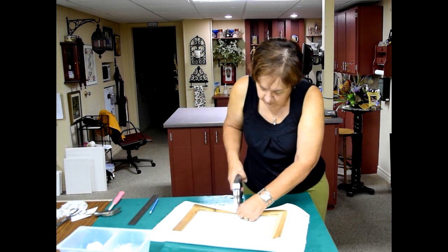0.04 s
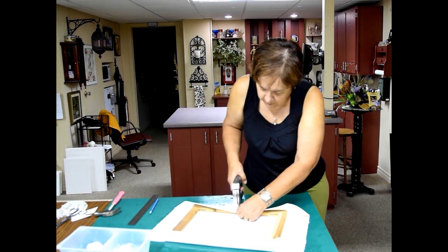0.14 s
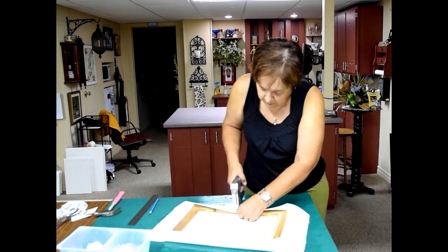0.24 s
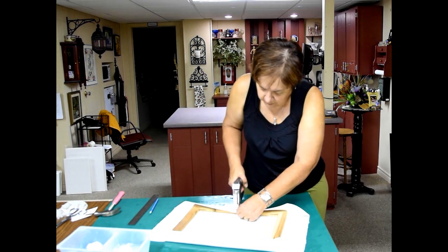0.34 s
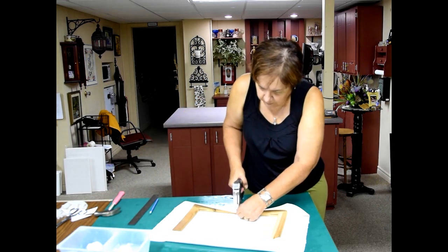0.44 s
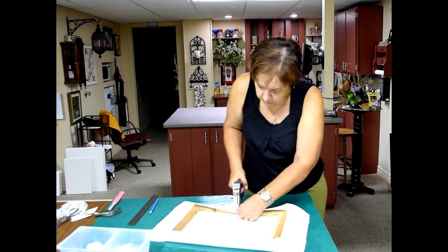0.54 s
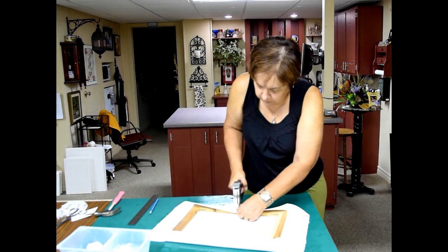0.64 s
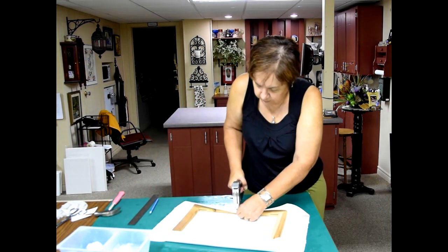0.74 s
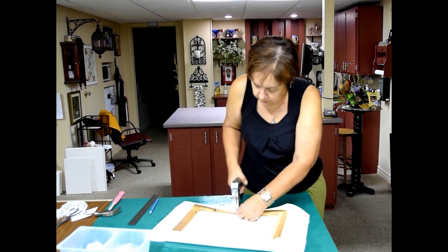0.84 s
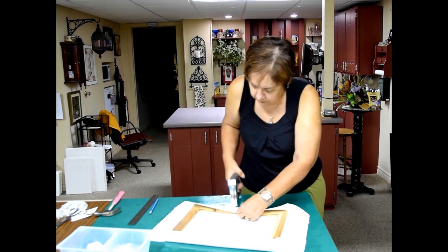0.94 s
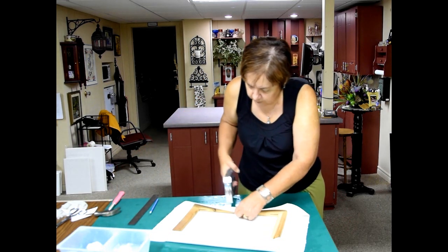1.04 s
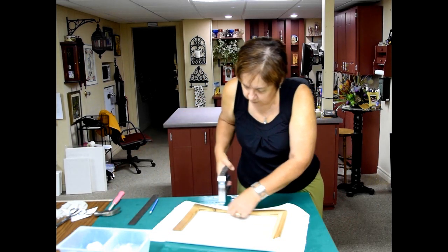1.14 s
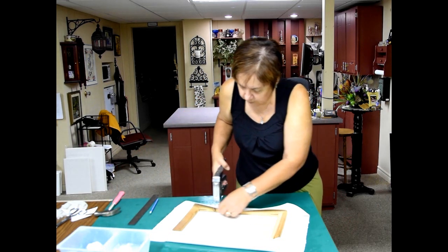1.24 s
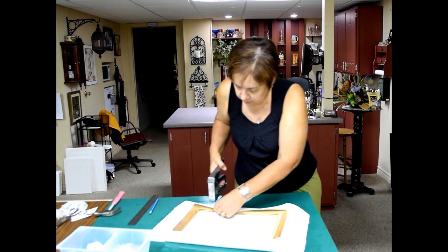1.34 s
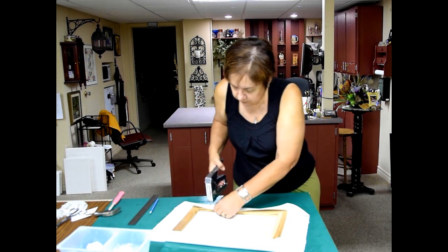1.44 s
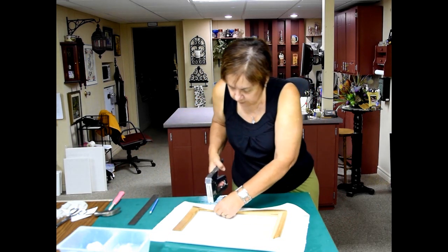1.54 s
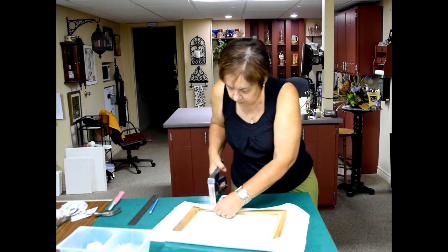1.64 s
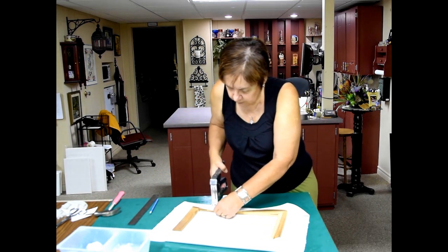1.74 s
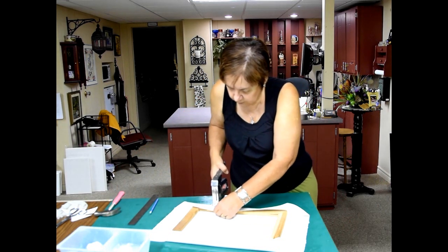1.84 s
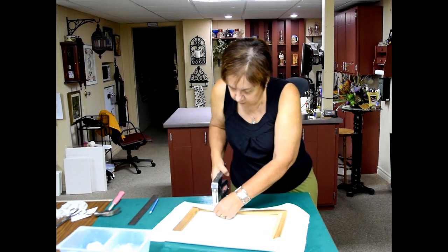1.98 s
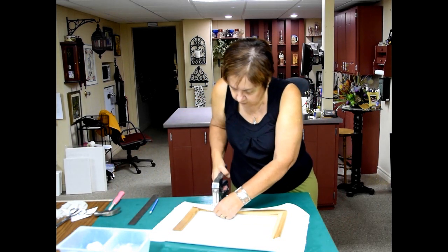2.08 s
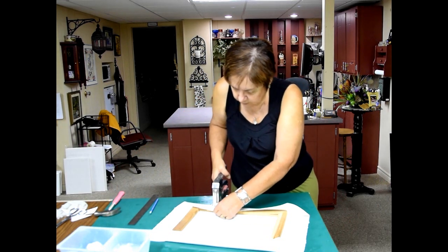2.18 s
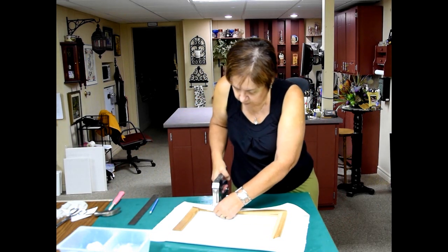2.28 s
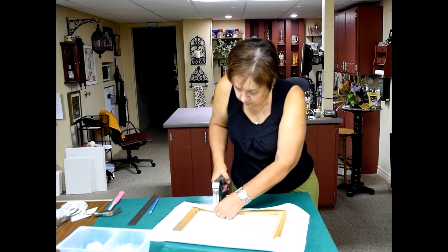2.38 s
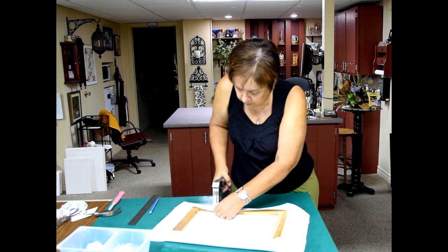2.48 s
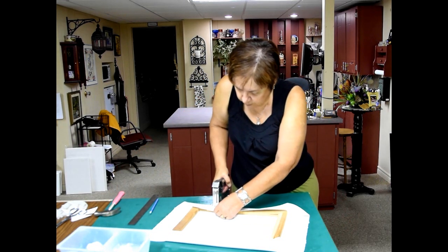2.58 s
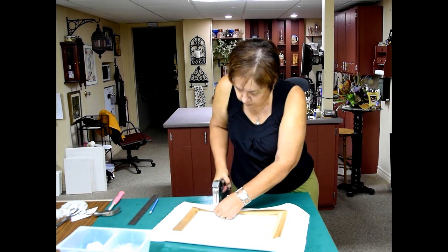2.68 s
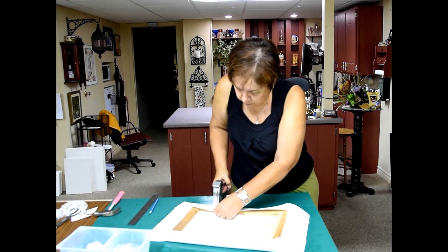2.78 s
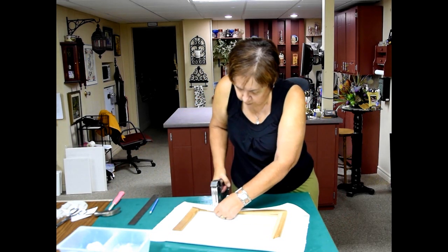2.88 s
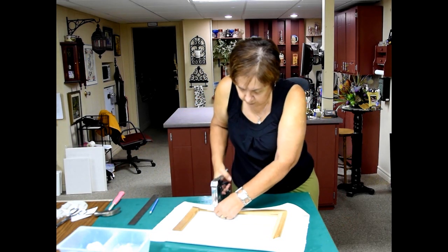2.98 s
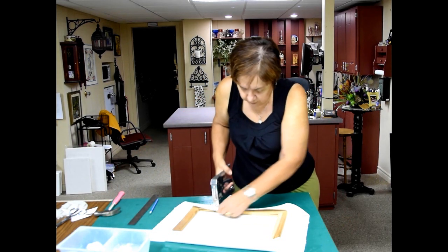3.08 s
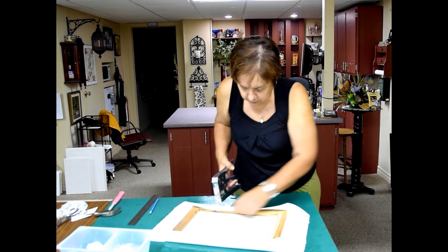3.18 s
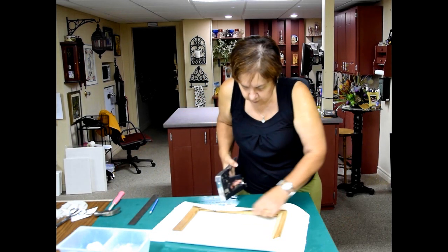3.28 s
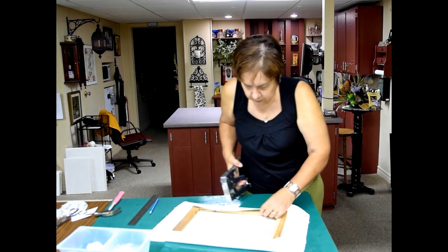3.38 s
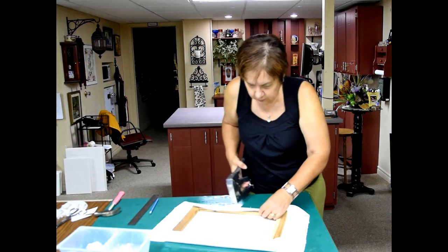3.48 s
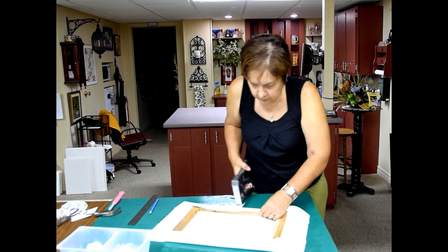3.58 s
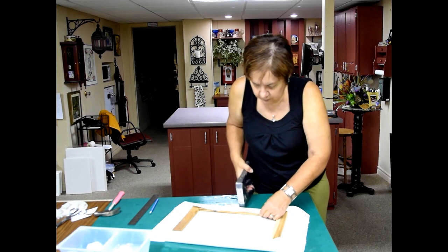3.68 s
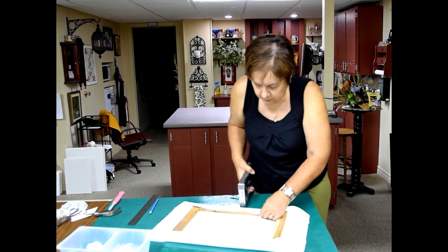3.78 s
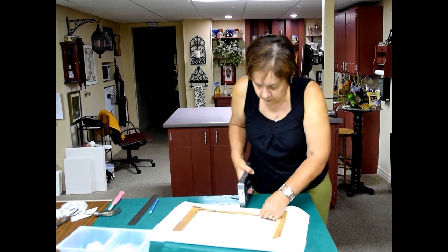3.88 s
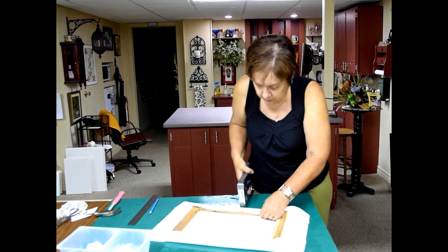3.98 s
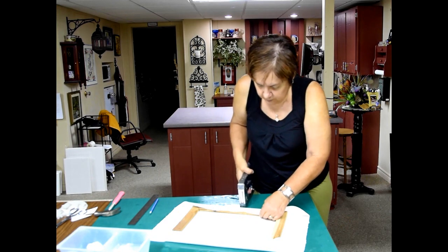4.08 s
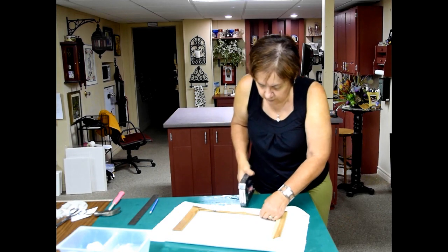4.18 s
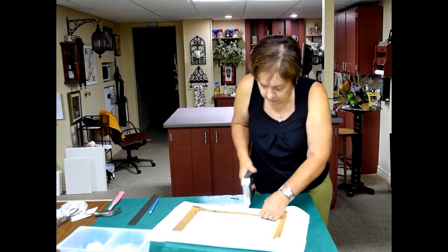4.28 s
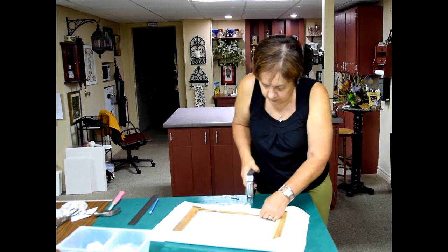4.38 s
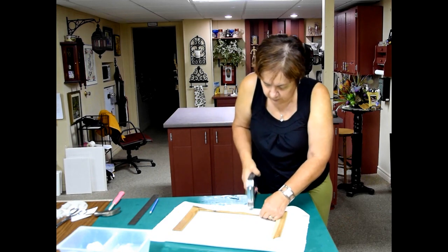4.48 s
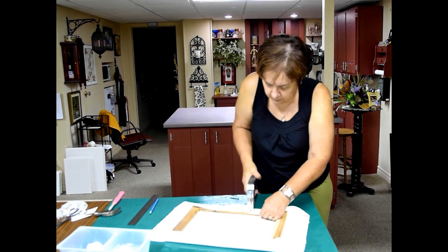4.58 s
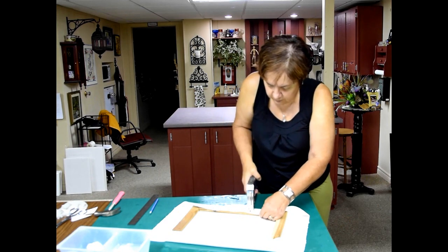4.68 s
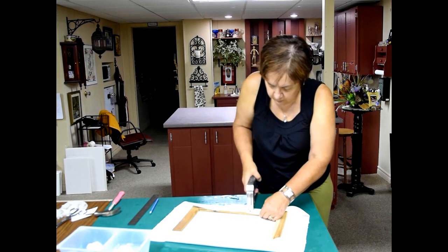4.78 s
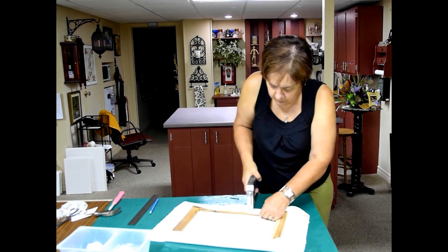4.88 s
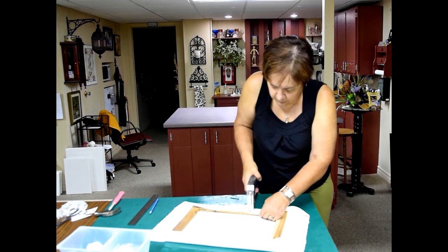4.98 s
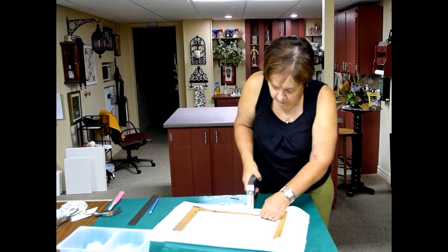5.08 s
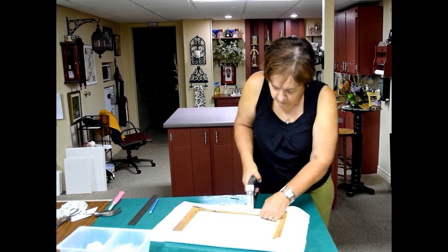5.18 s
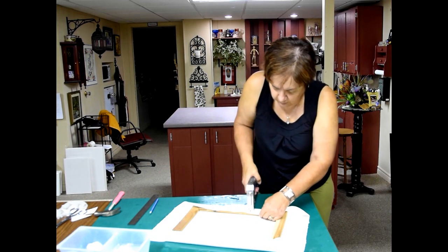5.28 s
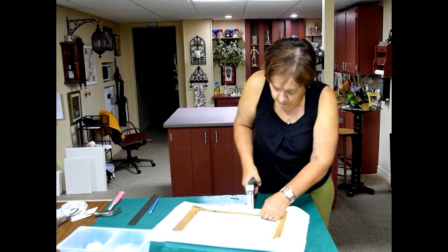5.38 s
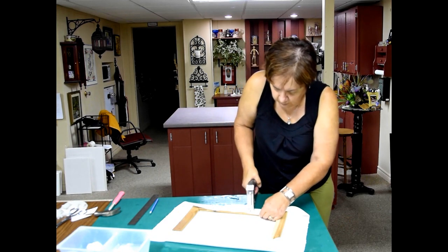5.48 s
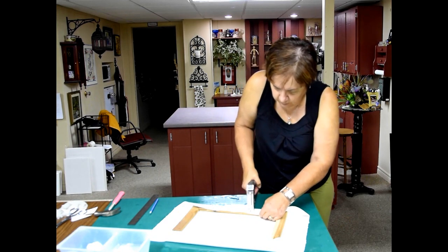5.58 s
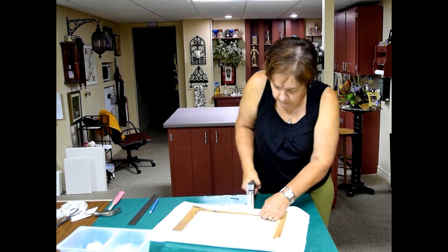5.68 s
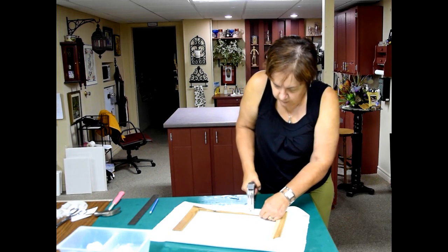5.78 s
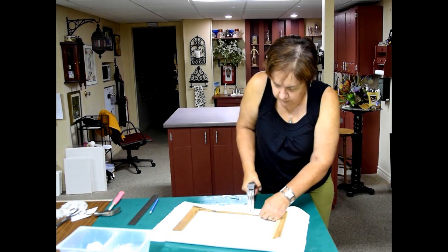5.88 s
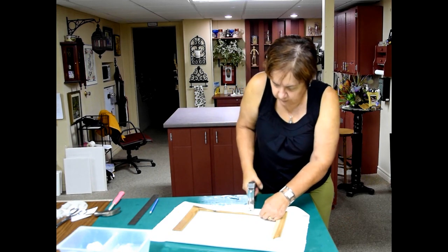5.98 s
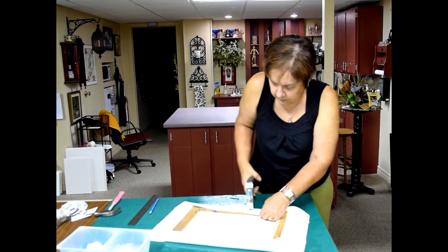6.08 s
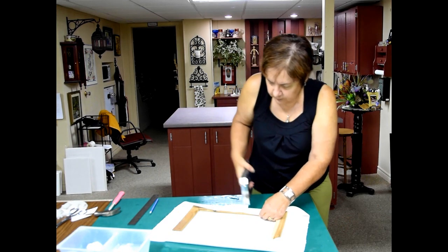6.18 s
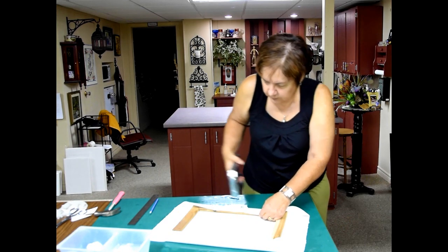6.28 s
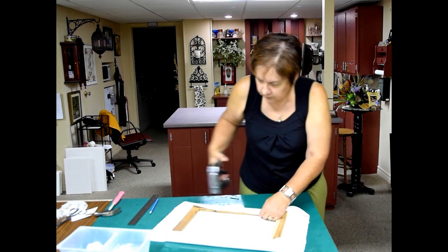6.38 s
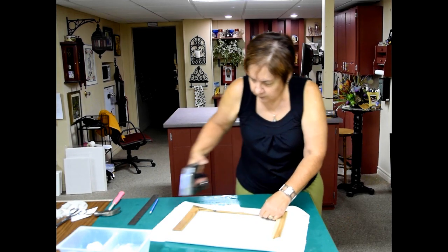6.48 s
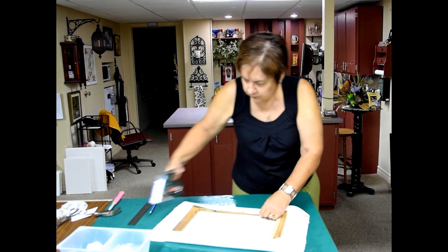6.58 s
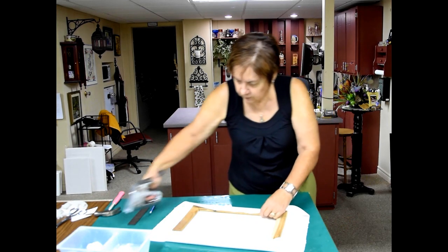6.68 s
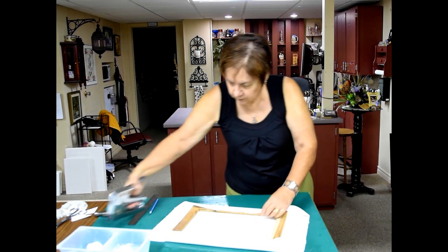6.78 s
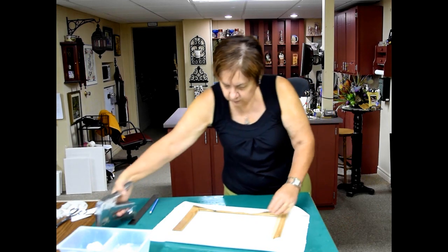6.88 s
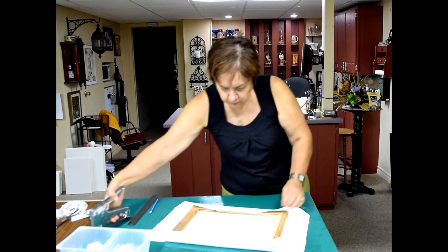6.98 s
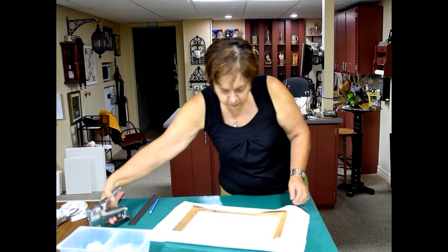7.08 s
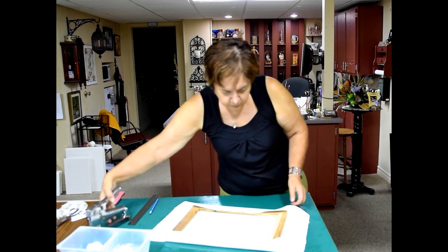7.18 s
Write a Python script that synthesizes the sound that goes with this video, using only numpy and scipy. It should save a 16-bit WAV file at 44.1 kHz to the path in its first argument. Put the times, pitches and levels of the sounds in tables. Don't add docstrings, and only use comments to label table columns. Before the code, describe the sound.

Quiet ventilation hush with a barely audible ticking clock. A lever is squeezed with light clicks, then a harsh, broad snap drives a staple; the lever rattles back. Two more shots follow, with hollow bumps on frame and table between. The hush surges at each shot, then sinks and slowly returns. Short indoor reverberation; the tool clatters down at the end.

```python
import sys
import numpy as np
from scipy import signal
from scipy.fft import rfft, irfft
from scipy.io import wavfile
from scipy.ndimage import uniform_filter1d

SR = 44100
rng = np.random.default_rng(int(sys.argv[2]) if len(sys.argv) > 2 else 0)


def file_out(sig):
    cols = np.atleast_2d(sig).T
    lim = np.clip(cols, -1, 1)
    pcm = np.round(lim * 32767).astype(np.int16)
    wavfile.write(sys.argv[1], SR, pcm)


def level_to_linear(level):
    exponent = np.asarray(level, float) / 20
    return 10 ** exponent


N = 319416

# [f/Hz, density/dB per Hz]
AIR_COLOUR = [(35, -60), (100, -36.5), (200, -19.5), (300, -10), (560, -5), (1010, 0), (2490, -10),
              (3400, -17.5), (4700, -27), (5600, -45.5), (9000, -59.5), (17600, -110)]
# [t/s, half length/s, level/dB]
PAPER_RUSTLES = [
    (2.45, 0.33, 2),
    (6.85, .06, 2.5),
    (5.6, .2, 2.5),
]
# [held open/s, sinks by/dB, still short when mostly back/dB, fully back/s]
HUSH_DUCKING = [
    (.1, 8.5, 2.5, 2.1),
    (.2, 12, 4.5, 0.98),
    (.36, 20.5, 0.5, .98),
]
# [f/Hz, T60/s]
ROOM_DECAY = [(45, 0.19), (110, 0.19), (280, 0.38), (700, 0.3), (1800, 0.29), (5000, 0.32), (13000, .3)]
# [t/s, peak level/dB, treble level/dB, strongest ring f/Hz]
TABLE_KNOCKS = [
    (2.107, -42.5, -31, 279.3),
    (3.026, -13.5, -31.5, 636),
    (3.849, -9, -31, 277),
    (4.662, -28, -36, 645),
    (4.673, -20, -26, 255.4),
    (6.088, -11.5, -11.5, 300),
]
# [t/s, peak level/dB, treble level/dB, strongest ring f/Hz]
GUN_ROCKING = [
    (7.088, -14, -26.5, 311),
    (7.099, -15, -41, 596),
    (7.112, -12.5, -28, 600),
    (7.122, -12, -29.5, 626),
    (7.135, -21.5, -28.5, 620),
    (7.155, -49, -31, 602),
    (7.208, -51, -37, 290),
]
# [t/s, peak level/dB, treble level/dB, strongest ring f/Hz, rattle/ms]
LEVER_RELEASES = [(1.191, -47, -35, 1120, 9), (1.238, -6.5, -15, 1285, 25), (1.248, -26, -32, 1427, 12),
                  (1.269, -19, -7, 1480, 8.4), (3.031, -10.5, -18, 2460, 5), (3.119, -27, -25.5, 2030, 9.6),
                  (3.296, -2, -22.5, 2060, 14), (3.323, -18.5, -6, 1640, 21), (3.365, -39, -24, 1650, 10),
                  (3.4, -24, -5.5, 1480, 3.9), (3.468, -34, -42, 1350, 21), (6.197, -31.5, -47, 1790, 11),
                  (6.294, -4.5, -22.5, 1960, 18), (6.322, -21.5, -15, 1910, 46)]
# [t/s, peak level/dB, treble level/dB, strongest ring f/Hz]
COCKING_CLICKS = [(0.154, -42, -26, 2030), (0.186, -37, -40.5, 1680), (0.463, -45, -44, 1540),
                  (0.509, -25.5, -33, 2100), (0.571, -18.5, -21.5, 2255), (0.584, -22, -20, 2240),
                  (0.606, -30, -15, 2340), (2.152, -37, -17, 2130), (2.191, -44.5, -27, 1230),
                  (2.341, -38, -34, 2240), (2.4, -36, -39.5, 1040), (2.552, -39.5, -34, 4060),
                  (2.605, -43, -29, 2240), (2.686, -9, -9, 3110), (2.708, -10, -15, 1260),
                  (4.266, -27, -17, 3320), (5.324, -27, -31.5, 2240), (5.349, -40.5, -31.5, 2270),
                  (5.568, -35.5, -42, 2340), (5.712, -4.5, -8, 3140), (5.734, -10, -16, 1270),
                  (6.182, -28, -24.5, 2140)]
# [t/s, peak level/dB, treble level/dB, strongest ring f/Hz,
# rattle/ms]
FURTHER_CATCHES = [
    (0.537, -38, -31.5, 1970, 5.6),
    (0.551, -33, -29.5, 2300, 13),
    (0.567, -13, -5, 2205, 4.3),
    (1.057, -34.5, -31.5, 3430, 16),
    (1.08, -40, -31.5, 2600, 26),
    (2.647, -28.5, -42, 1833, 51),
    (5.675, -19.5, -30, 1816, 18.4),
    (6.066, -28, -47.5, 1150, 6),
]
# [t/s, peak level/dB, treble level/dB, strongest ring f/Hz]
STRIKER_BLOWS = [
    (0.723, 4, -12, 2397),
    (2.806, 3.5, -13, 1760),
    (5.864, 1, -10.5, 2392),
]
# [t/s, f/Hz, level/dB, T60/s]
RINGING_PARTS = [(0.569, 2267, -26, 0.11), (0.606, 2300, -44.5, 0.4), (1.240, 4990, -41, 0.15),
                 (1.246, 1374, -36.5, 0.22), (1.240, 2860, -24.5, 0.056), (3.034, 2220, -34, 0.22),
                 (3.299, 1948, -26.5, 0.21), (3.324, 1658, -34.5, 0.32), (5.325, 2230, -38.5, 0.1),
                 (5.735, 1253, -38, 0.1), (6.184, 2050, -41.5, 0.18), (6.086, 449.5, -29, 0.17),
                 (6.295, 1930, -22, 0.09), (6.311, 1480, -35, 0.25)]

# [f/Hz, density/dB per Hz]
KNOCK_COLOUR = [(18, -57.5), (30, -27.5), (170, -20.5), (230, -5.5), (328, -7), (426, -9.5), (702, -9.5),
                (780, -14.5), (844, -16), (2230, -15), (16000, -65)]
ROCKING_COLOUR = [(18, -69), (30, -31.5), (161, -19.5), (303, -5), (461, -13), (600, -6), (1010, -14),
                  (1160, -11.5), (9710, -44.5), (13700, -59.5), (16000, -111)]
RELEASE_COLOUR = [(120, -99), (200, -65), (601, -25.5), (836, -23.5), (1400, -2), (1910, -1.5),
                  (3130, -8.5), (9580, -24.5), (12400, -39), (16000, -64)]
COCKING_COLOUR = [(59, -66), (100, -32.5), (547, -14), (891, -19), (1280, -4.5), (1450, -8.5), (2270, -2),
                  (9020, -17.5), (12900, -26.5), (16000, -55.5)]
BLOW_COLOUR = [(18, -54), (30, -31.5), (157, -35.5), (273, -4.5), (384, -10.5), (512, -8), (780, -10),
               (2410, -2.5), (3140, -8), (3580, -7.5), (5740, -14), (9460, -12), (16000, -33.5)]

# [f/Hz, width/Hz, boost/dB]
TABLE_MODES = [(290, 72, -8.5), (608, 23, 2), (934, 100, 0), (1194, 40, 2.5), (2300, 170, 1)]
RELEASE_MODES = [(1480, 170, 0.64), (2860, 30, 0.67), (4990, 140, 4), (7050, 69, 0.75), (9300, 220, 1)]
COCKING_MODES = [(1230, 90, -5.5), (3100, 90, 1.2), (3720, 170, 2), (9390, 210, 1.8)]
BLOW_MODES = [(545, 110, 2), (1350, 500, 4.5), (4260, 570, 0), (7130, 230, 0.5), (9450, 290, -2.5)]

AIR_REST_DB, AIR_WIDTH_DB, AIR_TOP_DB = -60, 1.1, -55
OPEN_DB, OPENING_S, CLOSING_S = 18.5, 0.12, 0.04
DEEPEST_S, HALF_BACK_S = 0.64, 0.9
SHUT_SHARE = 0.34
TICK_FIRST_S, TICK_EVERY_S, TICK_HZ, TICK_DB = 0.053, 0.5004, 4120, 6.5
OVERLOAD, CUTOFF_HZ, GRAIN_DB = 0.8, 16500, -95.5


def at_hz(points, hz):
    f_hz, values = np.array(points)[:, :2].T
    return np.interp(np.log(hz), np.log(f_hz), values)


def drift(rate):
    knots = rng.standard_normal(400)
    return np.interp(np.arange(N) / SR * rate, np.arange(400), knots)


def bands(count=20):
    edges = 20 * 2 ** (np.arange(count + 1) / 2)
    for low, high in zip(edges, edges[1:]):
        yield np.sqrt(low * high), signal.butter(2, [low, high], "band", fs=SR, output="sos")


def background_db(s):
    level = AIR_REST_DB
    for at, half_s, db in PAPER_RUSTLES:
        level = level + db * np.exp(-((s - at) / half_s) ** 2)
    for (at, *_), (open_s, sink_db, short_db, back_s) in zip(STRIKER_BLOWS, HUSH_DUCKING):
        steps_s = [-OPENING_S, 0, open_s, open_s + CLOSING_S, DEEPEST_S, HALF_BACK_S, back_s]
        steps_db = [0, OPEN_DB, OPEN_DB, -SHUT_SHARE * sink_db, -sink_db, -short_db, 0]
        level = level + np.interp(s - at, np.sort(steps_s), steps_db)
    return level


def ventilation(patchy_db):
    colour = level_to_linear(at_hz(AIR_COLOUR, np.arange(1, N // 2 + 2) * SR / N))
    hush = irfft(rfft(rng.standard_normal((2, N))) * colour, N)
    out = np.zeros(N)
    for k, (hz, sos) in enumerate(bands()):
        flicker_db = patchy_db * drift(10) + AIR_WIDTH_DB * np.abs(np.log2(hz / 1100))
        out += level_to_linear(flicker_db) * signal.sosfilt(sos, hush[k % 2])
    return out / np.sqrt(np.mean(out ** 2))


def clock(length_ms, width_hz):
    since_ms = (np.arange(N) / SR - TICK_FIRST_S) % TICK_EVERY_S * 1000
    puff = rng.standard_normal(N) * np.exp(-since_ms / length_ms)
    case = signal.butter(2, [TICK_HZ - width_hz / 2, TICK_HZ + width_hz / 2], "band", fs=SR, output="sos")
    return level_to_linear(TICK_DB) * signal.sosfilt(case, puff)


def background():
    gain = level_to_linear(np.minimum(background_db(np.arange(N) / SR), AIR_TOP_DB))
    return gain * (ventilation(patchy_db=2.5) + clock(length_ms=30, width_hz=1000))


def room_tails(gap_ms, lumpy_db, size=24000):
    s = np.arange(size) / SR
    white = rng.standard_normal((2, N + size))
    noise = np.array([signal.sosfilt(sos, white[k % 2]) for k, (hz, sos) in enumerate(bands())])
    echoes = np.interp(np.arange(N + size) / 200, np.arange(N // 100), rng.standard_normal(N // 100))
    noise = noise * level_to_linear(lumpy_db * echoes)
    dying = np.array([level_to_linear(-60 * s / at_hz(ROOM_DECAY, hz)) for hz, sos in bands()])
    dying = dying * (1 - np.exp(-(s * 1000 / gap_ms) ** 2))
    return lambda start: np.sum(noise[:, start:start + size] * dying, axis=0)


def causal(level_db):
    cepstrum = irfft(level_db * np.log(10) / 20)
    half = len(cepstrum) // 2
    cepstrum[1:half] *= 2
    cepstrum[half + 1:] = 0
    return np.exp(rfft(cepstrum))


def loudest(x):
    return np.sqrt(np.max(uniform_filter1d(x ** 2, size=200)))


def micro_impacts(ms, lead_ms, length_ms, grit_db, creep):
    size = len(ms)
    impacts = rng.standard_normal(size) * level_to_linear(grit_db * np.minimum(rng.exponential(1, size), 4))
    sliding_in = level_to_linear(-36 * (creep - ms / lead_ms))
    rattling_out = np.exp(-np.abs(ms - lead_ms) / max(length_ms, 0.3))
    return impacts * np.where(ms < lead_ms, sliding_in, rattling_out)


def resonances_db(hz, modes):
    power = np.ones(len(hz))
    for (centre_hz, width_hz, ring_db), luck in zip(modes, rng.normal(0, 2.0, len(modes))):
        power += level_to_linear(2 * (ring_db + luck)) / (1 + (2 * (hz - centre_hz) / width_hz) ** 2)
    return 10 * np.log10(power)


def contacts(rows, tone, rings, tail_at, ring, boost_db, wet_db, grit_db, lead_ms, rattle_ms, soft_bass,
             high_thin_db, creep=1.4, size=24000):
    out = np.zeros(N + size)
    ms = np.arange(size) / SR * 1000
    hz = np.maximum(np.arange(size // 2 + 1) * SR / size, 10)
    known = np.array([row[:4] for row in rows])
    _, usual_peak_db, usual_treble_db, usual_hz = np.average(known, axis=0, weights=level_to_linear(2 * known[:, 1]))
    for s, peak_db, treble_db, ring_hz, *own_ms in rows:
        start = round((s - lead_ms / 1000) * SR)
        length_ms = own_ms[0] if own_ms else rattle_ms
        rattle = micro_impacts(ms, lead_ms, length_ms, grit_db, creep)
        tail = np.roll(tail_at(start), round(lead_ms / 1000 * SR))
        bass_db = soft_bass * (usual_peak_db - peak_db) - high_thin_db * np.log2(ring_hz / usual_hz)
        tilt_db = bass_db / (1 + (hz / 800) ** 3)
        tilt_db += (treble_db - usual_treble_db) * np.log2(1 + (hz / 3500) ** 2) / 2.1
        body = causal(at_hz(tone, hz) + tilt_db + resonances_db(hz, [(ring_hz, *ring), *rings]))
        direct = irfft(rfft(rattle) * body)
        wet = irfft(rfft(tail) * body)
        blend = direct / loudest(direct) + level_to_linear(wet_db) * wet / loudest(wet)
        out[start:start + size] += level_to_linear(peak_db + boost_db) * blend
    return out[:N]


def knocks(tail_at):
    return contacts(TABLE_KNOCKS, KNOCK_COLOUR, TABLE_MODES, tail_at, (90, 0.1), boost_db=-11.5, wet_db=-8.5,
                    grit_db=5.5, lead_ms=2.5, rattle_ms=19, soft_bass=0.2, high_thin_db=14.5)


def rocking(tail_at):
    return contacts(GUN_ROCKING, ROCKING_COLOUR, TABLE_MODES, tail_at, (60, 4), boost_db=2.5, wet_db=-20.5,
                    grit_db=8.0, lead_ms=0.85, rattle_ms=8.5, soft_bass=0.37, high_thin_db=-3)


def ringing(spread_hz, size=20000):
    out = np.zeros(N + size)
    s = np.arange(size) / SR
    for (at, hz, db, t60), luck in zip(RINGING_PARTS, rng.uniform(-1, 1, (len(RINGING_PARTS), 10))):
        cluster = np.zeros(size)
        for detune, phase in zip(luck[:5], luck[5:]):
            cluster += np.sin(2 * np.pi * (hz + spread_hz * detune) * s + np.pi * phase)
        start = round(at * SR)
        onset = 1 - np.exp(-s / 0.00098)
        out[start:start + size] += level_to_linear(db - 60 * s / t60) * onset * cluster
    return out[:N]


def release(tail_at):
    return contacts(LEVER_RELEASES, RELEASE_COLOUR, RELEASE_MODES, tail_at, (150, 5), boost_db=-12.0,
                    wet_db=-11.5, grit_db=1.5, lead_ms=18, rattle_ms=12, soft_bass=0.4, high_thin_db=3.5,
                    creep=1.44)


def cocking(tail_at):
    return contacts(COCKING_CLICKS + FURTHER_CATCHES, COCKING_COLOUR, COCKING_MODES, tail_at, (70, 8),
                    boost_db=-9.5, wet_db=-13.0, grit_db=7, lead_ms=4.9, rattle_ms=13.0, soft_bass=0.15,
                    high_thin_db=3.5)


def shots(tail_at):
    return contacts(STRIKER_BLOWS, BLOW_COLOUR, BLOW_MODES, tail_at, (300, 3), boost_db=3.5, wet_db=-7,
                    grit_db=-3, lead_ms=0.71, rattle_ms=10.5, soft_bass=0.01, high_thin_db=5)


def scene():
    tail_at = room_tails(gap_ms=3.3, lumpy_db=1.3)
    table = knocks(tail_at) + rocking(tail_at)
    gun = ringing(spread_hz=120) + release(tail_at) + cocking(tail_at) + shots(tail_at)
    return (background() + table + gun)[None]


def soft_top(x, top):
    return x / (1 + np.abs(x / top) ** 8) ** (1 / 8)


def noise_gate(x, threshold_db, rise):
    hz, s, cells = signal.stft(x, SR, nperseg=512)
    power = uniform_filter1d(np.abs(cells) ** 2, size=7, axis=-2)
    power = uniform_filter1d(power, size=3, axis=-1)
    held_db = np.maximum(-42 - background_db(s), 0)
    limit = level_to_linear(2 * (threshold_db + rise * held_db))
    return signal.istft(cells * power / (power + limit), SR, nperseg=512)[1][..., :N]


def low_pass(x):
    return signal.sosfilt(signal.butter(12, 17130, fs=SR, output="sos"), x)


def record(dry):
    quiet = noise_gate(soft_top(dry, OVERLOAD), threshold_db=-100, rise=0.58)
    top_cut = signal.cheby2(10, 40, CUTOFF_HZ, fs=SR, output="sos")
    limited = soft_top(signal.sosfilt(top_cut, quiet), OVERLOAD)
    grain = level_to_linear(GRAIN_DB) * rng.standard_normal(dry.shape)
    return low_pass(signal.sosfilt(top_cut, limited) + grain)


dry = scene()
out = record(dry)
file_out(out)
```